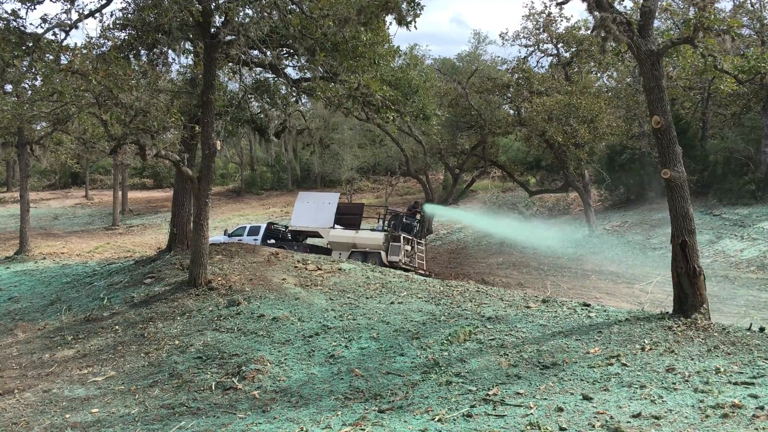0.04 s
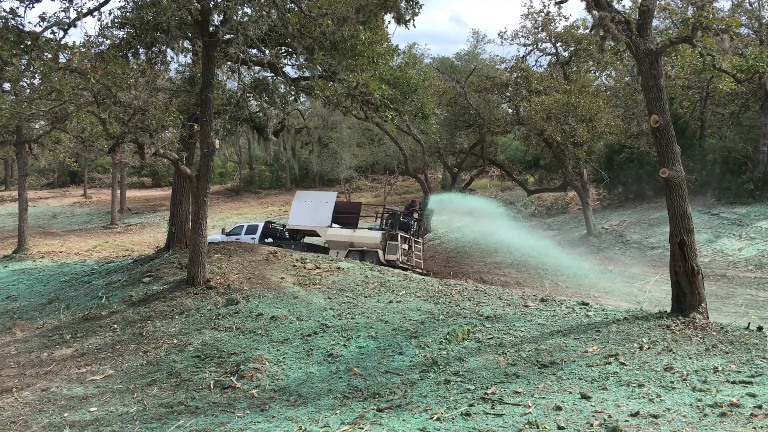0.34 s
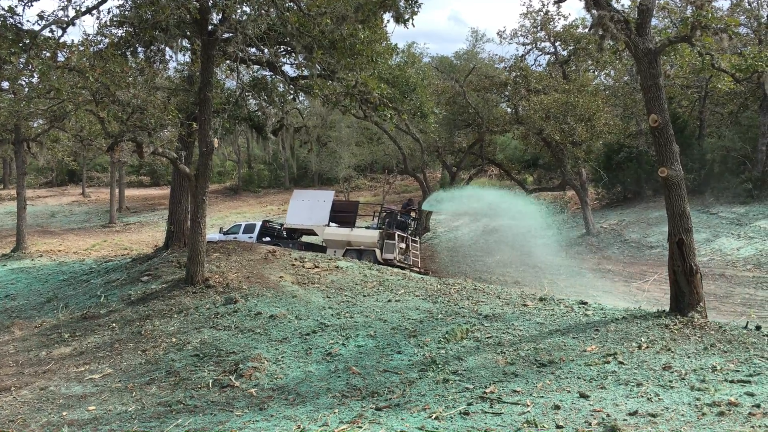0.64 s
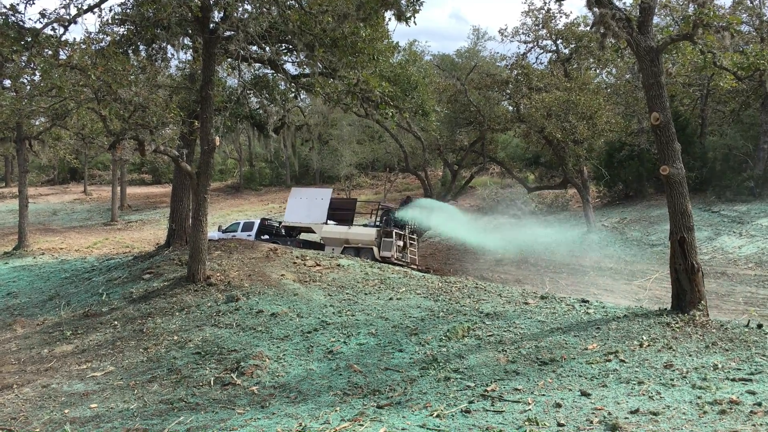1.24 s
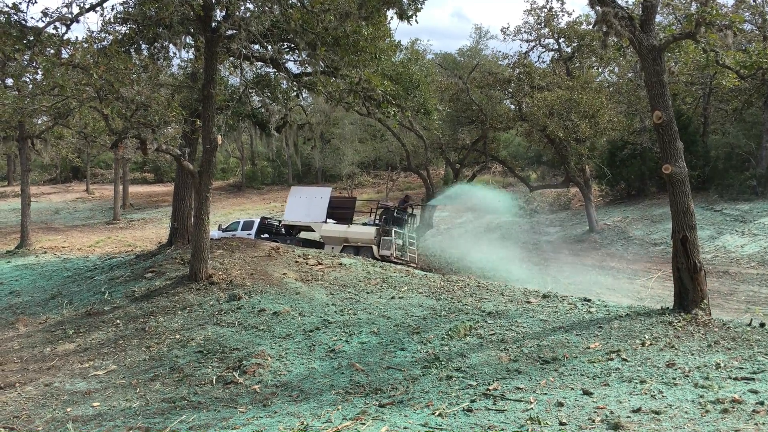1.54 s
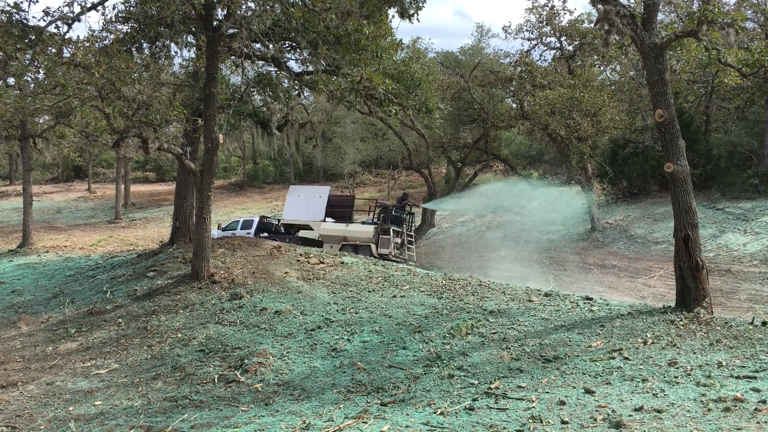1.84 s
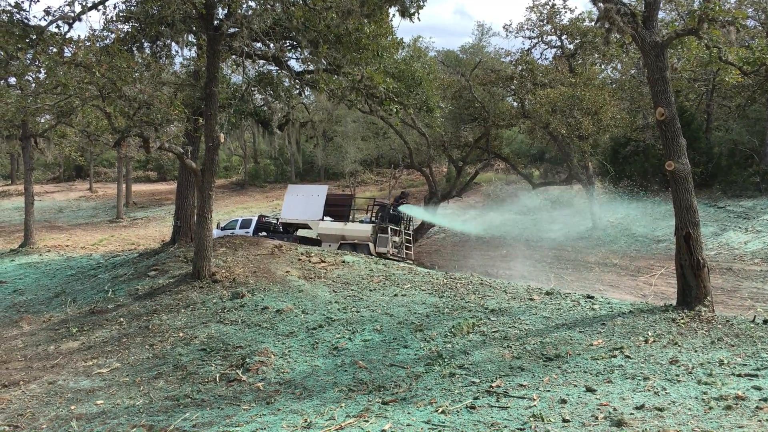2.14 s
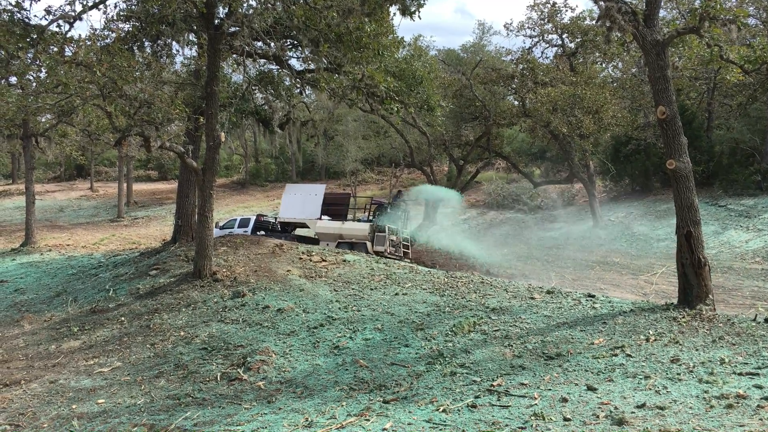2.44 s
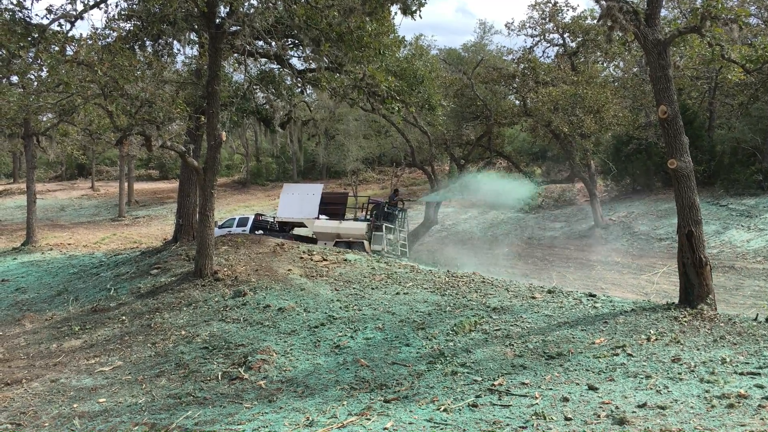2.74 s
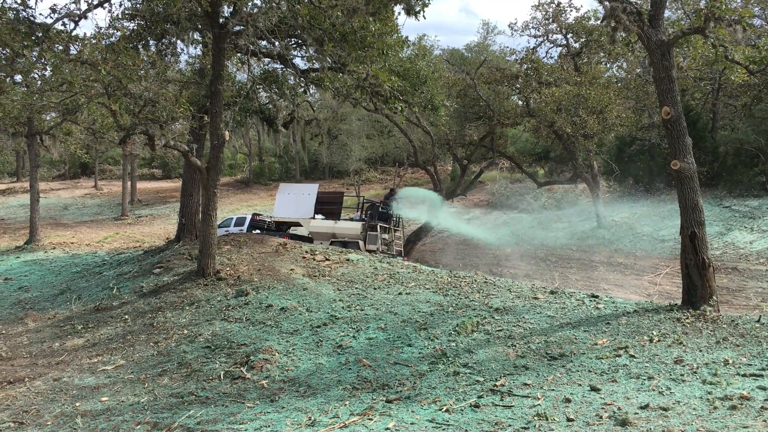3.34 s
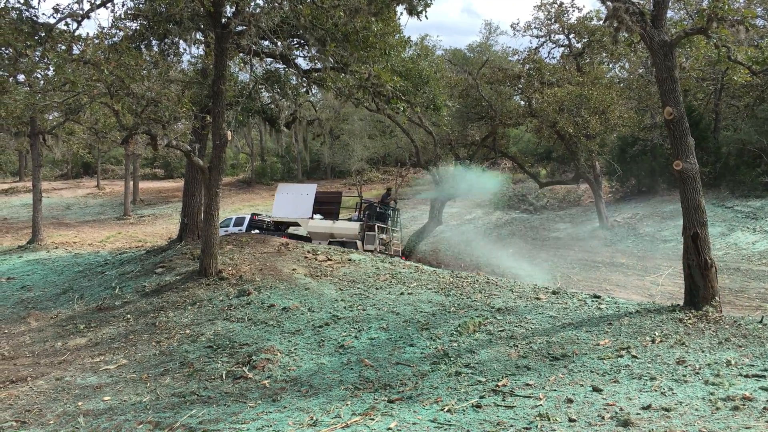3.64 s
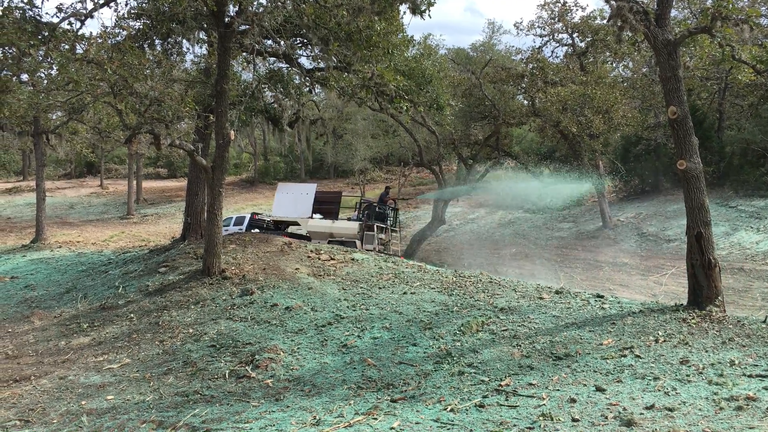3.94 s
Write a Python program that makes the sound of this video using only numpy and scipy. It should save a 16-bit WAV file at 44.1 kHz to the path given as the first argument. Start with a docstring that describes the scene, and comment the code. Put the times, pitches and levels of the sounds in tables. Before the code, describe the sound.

A truck-mounted sprayer's engine and pump roar steadily under a rushing jet of slurry.

```python
"""A truck-mounted hydroseeder works some way off among trees, spraying slurry over bare ground.
From the start its engine and pump turn at slightly different speeds, so their strongest tones throb.
A deep rumble, engine clatter and a few whines lie under the rush of the jet and the patter of slurry.
Early on the rumble surges unevenly and dull knocks sound; one more knock comes near the third second.
The machine and the spray run on to the end."""
import sys
import numpy as np
from scipy import signal
from scipy.fft import rfft, irfft
from scipy.io import wavfile

SR = 44100
rng = np.random.default_rng(int(sys.argv[2]) if len(sys.argv) > 2 else 0)


def transcribe(u):
    """Save the signal u as a 16-bit wav file named by the first command-line argument.

    u: samples, shape (n,) or (channels, n), limited to [-1, 1]; the rate is SR.
    q: integer samples, one column per channel.
    """
    v = np.clip(np.atleast_2d(u).T, -1, 1)
    q = np.round(v * 32767).astype(np.int16)
    wavfile.write(sys.argv[1], SR, q)


N = 176400
TIME = np.arange(N) / SR

ENGINE_HZ, PUMP_HZ = 24.158, 23.205   # turns per second
CYLINDERS = 4
IN_STEP_S, THROB_DB = 1.94, 1   # a moment when engine and pump are in step; how far the throb swings
# Tone colour shared by the machine's roar and clatter: (pitch [Hz], relative level [dB])
ROAR_SPECTRUM = [(150, -6.5), (290, 0), (420, -2.5), (480, 0), (535, 4.5), (660, 0.5), (765, 2.5), (880, 0),
                 (1250, 0.35), (1750, -4), (1950, -0.9), (2150, -6.5), (2450, -8), (2650, -13.5),
                 (3000, -13.5), (5000, -41.5)]


def from_db(db):
    """Turn decibels into a number to multiply a sound by."""
    return 10 ** (np.asarray(db) / 20)


def unit_power(sound):
    """Scale a sound so that its average power is 1."""
    return sound / np.sqrt(np.mean(sound ** 2) + 1e-20)


def gain_curve(rows):
    """Join (time [s], level [dB]) points into a volume for every sample."""
    return from_db(np.interp(TIME, *np.transpose(rows)))


def drift(rate_hz):
    """A smooth random wobble of about size 1; a higher rate makes it quicker."""
    step = 40   # samples between random points
    keep = np.exp(-2 * np.pi * step * rate_hz / SR)
    points = rng.standard_normal(N // step + 2002)
    smooth = signal.lfilter([1], [1, -2 * keep, keep * keep], points)[2000:]   # skip the settling-in
    return np.interp(np.arange(N) / step, np.arange(len(smooth)), unit_power(smooth))


def colour(sound, spectrum):
    """Shape a sound's lows and highs by (pitch [Hz], level [dB]) points, then set its power to 1."""
    hz, db = np.transpose(spectrum)
    bin_hz = np.maximum(np.arange(N // 2 + 1) * SR / N, 1)
    gains = from_db(np.interp(np.log(bin_hz), np.log(hz), db))
    return unit_power(irfft(rfft(sound) * gains, N))


def noise(spectrum):
    """The noise of churning air, with the given tone colour."""
    return colour(rng.standard_normal(N), spectrum)


def tone(hz, db):
    """A tone heard through moving air: the higher it is, the more its timing and level waver."""
    khz = hz / 1e3
    phase = 2 * np.pi * hz * (TIME - IN_STEP_S) + .8 * khz * drift(rate_hz=2.5)
    waver_db = 2.2 * np.sqrt(khz) * drift(rate_hz=2.5)
    return np.sqrt(2) * from_db(db + waver_db) * np.cos(phase)


def throb(depth_db):
    """A volume that rises and falls as engine and pump slip in and out of step."""
    beat_hz = CYLINDERS * (ENGINE_HZ - PUMP_HZ)
    return from_db(depth_db * np.cos(2 * np.pi * beat_hz * (TIME - IN_STEP_S)))


def drone():
    """Engine and pump hum; their tones at four times the turning rate beat against each other."""
    # Tones of the engine: (multiple of its turning rate, level [dB])
    engine_tones = [(2, -37.5), (3, -55.5), (4, -37.5), (12.5, -52), (13, -65.5), (16, -72.5), (25, -65.5)]
    # Tones of the pump: (multiple of its turning rate, level [dB])
    pump_tones = [(4, -32.5), (5, -50.5), (8, -55.5), (10, -58.5), (12, -57.5)]
    # How the whole hum swells and dips: (time [s], level change [dB])
    drone_level = [(0, -4.5), (.2, -15.5), (.38, -7), (.49, -5.5), (.58, 2), (.7, -6.5), (.78, -5),
                   (.85, -1), (1.15, 0), (1.46, 0.5), (1.54, -5), (1.63, 2.5), (1.9, 0), (2.95, 0.2),
                   (3.25, -1), (3.55, -3.5), (4, 0.5)]
    firing, *overtones = [tone(multiple * ENGINE_HZ, db) for multiple, db in engine_tones]
    pump = sum(tone(multiple * PUMP_HZ, db) for multiple, db in pump_tones)
    return gain_curve(drone_level) * (throb(THROB_DB) * firing + sum(overtones) + pump)


def rumble():
    """A deep rumble that surges unevenly at first, like wind on a microphone, and swells with the throb."""
    # Tone colour of the rumble: (pitch [Hz], relative level [dB])
    spectrum = [(15, -32), (26, -21), (35, -9), (45, -2), (60, -2), (80, -2.5), (105, -7), (125, -11),
                (160, -19), (300, -59.5)]
    # How it swells and dips: (time [s], level change [dB])
    level = [(0, 5.5), (.1, -1), (.22, -3), (.27, 4), (.42, -1), (.51, 0), (.57, 9), (.67, 1), (.74, 8),
             (.79, -5), (.86, 0.5), (1.15, -1.5), (1.4, 3), (1.54, -4), (1.66, 4.5), (1.82, -2.5),
             (2.5, 0.5), (3.55, 1), (4, -1)]
    return from_db(-37.5) * gain_curve(level) * throb(THROB_DB) * noise(spectrum)


def machine_body():
    """The machine's body gives off a throbbing, uneven boom and a higher growl."""
    # Tone colour of each: (pitch [Hz], relative level [dB])
    boom_spectrum = [(80, -22), (130, 3), (152, -1.5), (180, 4.5), (215, 3), (250, -5.5), (300, -22),
                     (500, -41.5)]
    growl_spectrum = [(200, -17.5), (255, -4.5), (290, -0.5), (365, 1), (395, -2.5), (425, -15), (600, -41)]
    # How each swells and dips: (time [s], level change [dB])
    boom_level = [(0, -5), (.06, -11), (.45, -8), (.75, -2), (1.1, -0.5), (1.22, 5.5), (1.32, -12),
                  (1.75, 0), (2.5, -1.1), (2.95, 0.5), (3.06, -8), (3.2, -2), (3.4, -0.5), (3.8, 2), (4, 3)]
    growl_level = [(0, -3.5), (.14, 3), (.36, -2.5), (.6, -1.5), (.94, 2), (1.4, -3.5), (1.8, 1.5),
                   (2.3, -1.5), (3, 0), (4, 0)]
    boom = from_db(-44.5) * gain_curve(boom_level) * noise(boom_spectrum)
    growl = from_db(-45.5) * gain_curve(growl_level) * noise(growl_spectrum)
    sway_db = 1.95 * drift(rate_hz=6.9)
    return throb(depth_db=1.3) * from_db(sway_db) * boom + growl


def clatter():
    """The same rattle comes round every two engine turns, swelling each time a cylinder fires."""
    cycles = TIME * ENGINE_HZ / 2
    rattle = rng.standard_normal(int(2 * SR / ENGINE_HZ))
    looped = np.interp(cycles % 1 * len(rattle), np.arange(len(rattle)), rattle)
    firing_swell = 1 + 0.24 * np.cos(2 * np.pi * CYLINDERS * cycles)
    return colour(looped * firing_swell, ROAR_SPECTRUM)


def roar():
    """The running machine makes a broad roar with quieter clatter inside it."""
    # Slight rise and fall of both: (time [s], level change [dB])
    level = [(0, 1.1), (.35, 1.5), (.8, -0.0012), (1.1, 0.56), (1.75, -.7), (2.6, -0.29), (3.2, 0.088),
             (4, -0.48)]
    return gain_curve(level) * (from_db(-43.5) * noise(ROAR_SPECTRUM) + from_db(-52) * clatter())


def whines():
    """The spinning drives and fan give thin, wavering tones."""
    # One row for each whine: (pitch [Hz], level [dB])
    whine_tones = [(217.8, -51.5), (391.4, -62), (782.6, -63), (813.1, -63), (1566, -65), (1670, -67),
                   (1950, -69)]
    return sum(tone(hz, db) for hz, db in whine_tones)


def drops(per_second=3500, spread_db=4.5):
    """Slurry drops land at random, most small and a few large."""
    sizes = from_db(spread_db * np.minimum(rng.exponential(1, N), 6))
    signs = rng.choice([-1, 1], N)
    landed = rng.random(N) < per_second / SR
    return unit_power(sizes * signs * landed)


def spray():
    """The jet rushes and its drops patter, changing colour as the nozzle is swung about."""
    # Tone colour of the spray's three bands, lowest first: (pitch [Hz], relative level [dB])
    rush = [(2000, -12), (2900, -13.5), (3120, 1), (3900, -.5), (4550, -1.5), (4900, -7.5), (5300, -5),
            (6200, -7.5), (6950, -5.5), (7600, -15.5), (10000, -31)]
    hiss = [(5500, -28), (7100, 3), (7700, 3), (9200, 2), (10000, -3.5), (10500, -13), (11500, -45)]
    mist = [(8000, -9), (10400, 1), (11000, 5.5), (12000, 3), (13200, 5.5), (14200, -2), (15700, -5.5)]
    # How each band swells and dips: (time [s], level change [dB])
    rush_level = [(0, 2.3), (.33, 1.5), (.45, 0.5), (.73, -1.5), (.78, 0.2), (1, 0), (1.18, 2), (1.35, 2),
                  (1.7, 1.2), (2.4, -1.3), (2.65, 0), (2.95, 0.7), (3.03, -1.5), (3.15, -0.2), (3.22, 1.7),
                  (3.42, -1), (3.56, .6), (3.8, -0.9), (3.9, 0.8), (4, -.5)]
    hiss_level = [(0, 0), (.5, .5), (.76, -1), (.83, 0.5), (1.15, -2.5), (1.42, 1), (1.7, 0.5), (2.07, -2),
                  (2.5, 0), (2.64, -1.3), (2.75, 1.5), (2.83, -.2), (3.12, 1.7), (3.24, 3), (3.45, -1.5),
                  (3.58, 1.5), (3.7, -2), (3.87, 2.5), (4, -2)]
    mist_level = [(0, 1), (.35, 3), (.55, 2), (.72, .5), (.85, 2), (1.03, -1), (1.25, 2), (1.55, 1.3),
                  (1.67, 2), (1.98, -3), (2.2, 0.5), (2.58, -6), (2.93, .5), (3.22, -3.5), (3.3, -9),
                  (3.39, -10), (3.5, -1.5), (3.7, -3), (4, 1.5)]
    patter = from_db(-12) * drops()
    flutter = from_db(0.53 * drift(rate_hz=19))   # the jet breaks up unevenly
    bands = [(rush, rush_level, -49.5), (hiss, hiss_level, -58.5), (mist, mist_level, -62.5)]
    sound = np.zeros(N)
    for spectrum, level, db in bands:
        jet = rng.standard_normal(N)
        sound += from_db(db) * gain_curve(level) * colour(jet + patter, spectrum)
    return flutter * sound


def knocks(attack_s=.005):
    """Each dull knock rings the same few low notes; some blows favour the higher, some the lower."""
    # The blows: (time [s], level [dB], lean towards higher notes [dB per octave])
    blows = [(0, -29.5, -11.5), (.223, -32.5, 3), (.279, -33, 10), (.405, -35, 6), (.655, -37.5, 4),
             (.727, -32, -1), (0.913, -35, 3), (1.255, -36, -15), (2.935, -33, -2)]
    # The notes they ring: (pitch [Hz], relative level [dB], time to fade by 60 dB [s])
    notes = [(166.4, 1, 0.096), (267.5, -1, 0.077), (335.7, -3, 0.11), (385.6, -2.5, 0.12)]
    pivot_hz = notes[1][0]   # the lean leaves this note as it is
    sound = np.zeros(N)
    for start, blow_db, lean_db in blows:
        age = np.maximum(TIME - start, 0)
        rise = -np.expm1(-age / attack_s)
        for hz, note_db, fade_s in notes:
            struck_db = blow_db + note_db + lean_db * np.log2(hz / pivot_hz)
            faded_db = 60 * np.minimum(age / fade_s, 3)
            ring = np.sin(2 * np.pi * (hz * age + rng.random()))
            sound += from_db(struck_db - faded_db) * rise * ring
    return sound


def scene():
    """The machine, the rumble, the spray and the knocks, mixed into one channel."""
    mix = drone() + rumble() + machine_body() + roar() + whines() + spray() + knocks()
    return mix[None]


def record(dry):
    """Cut away the very highest treble with a steep filter."""
    cutoff_hz = 15700
    return signal.sosfilt(signal.ellip(16, .1, 70, cutoff_hz, fs=SR, output="sos"), dry)


dry = scene()
out = record(dry)
transcribe(out)
```